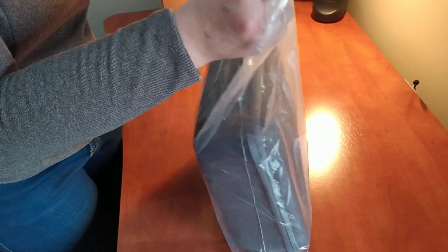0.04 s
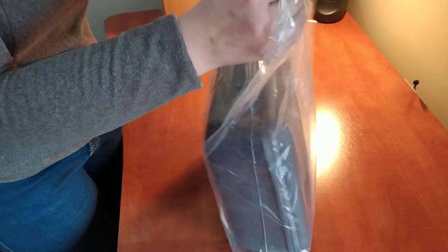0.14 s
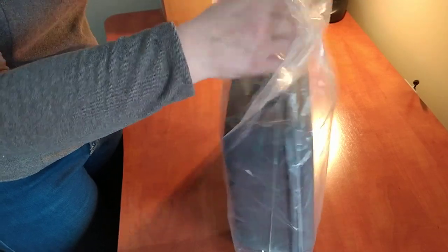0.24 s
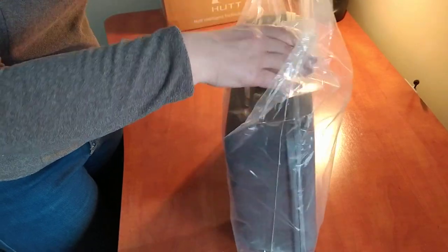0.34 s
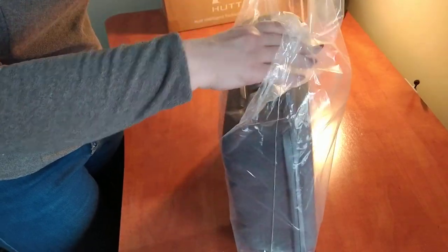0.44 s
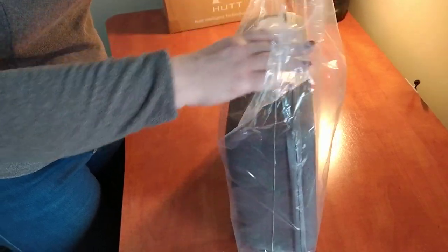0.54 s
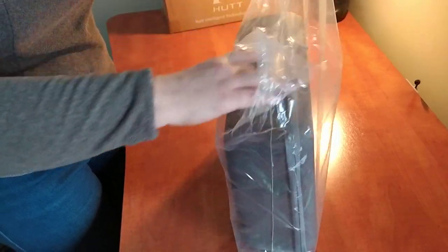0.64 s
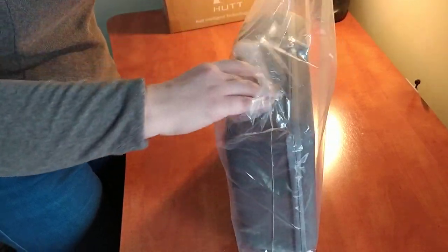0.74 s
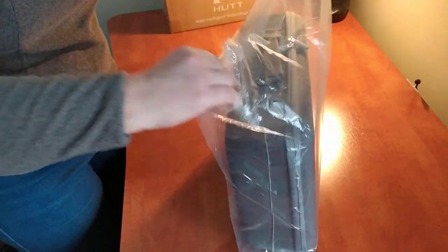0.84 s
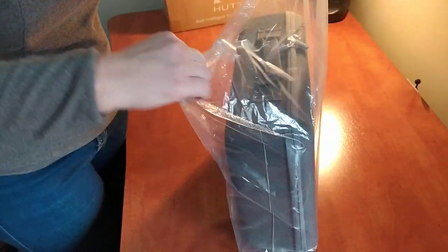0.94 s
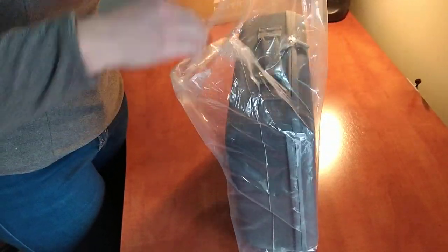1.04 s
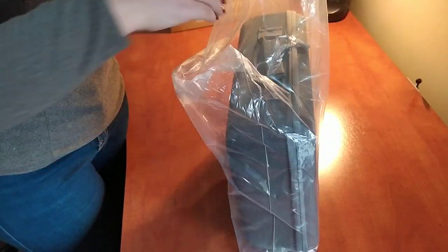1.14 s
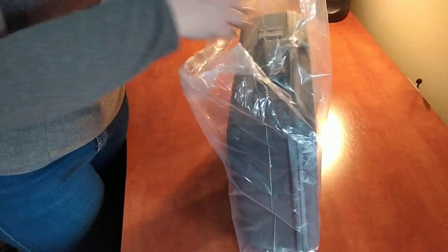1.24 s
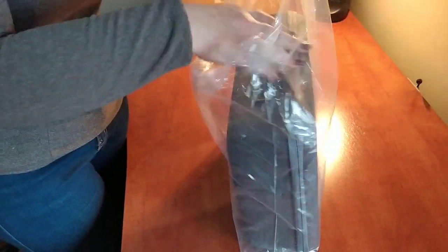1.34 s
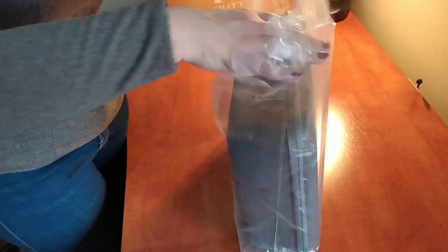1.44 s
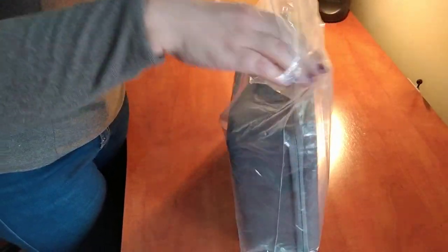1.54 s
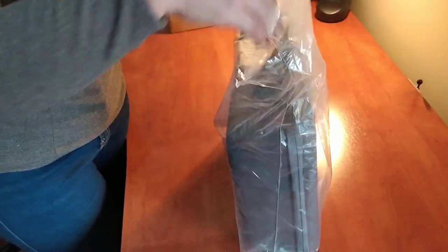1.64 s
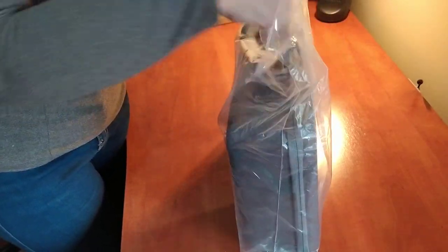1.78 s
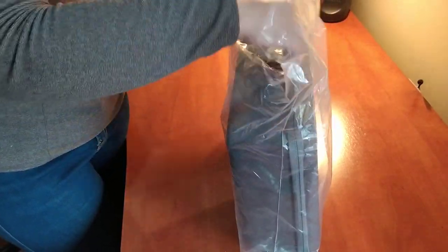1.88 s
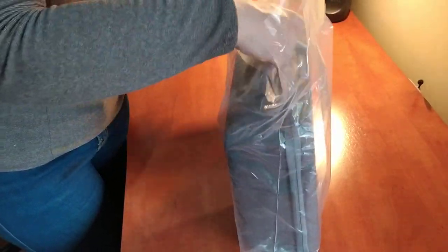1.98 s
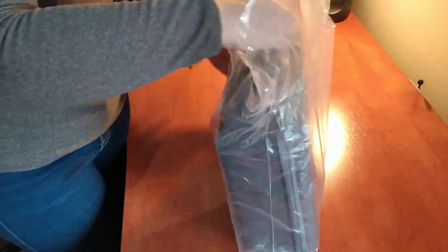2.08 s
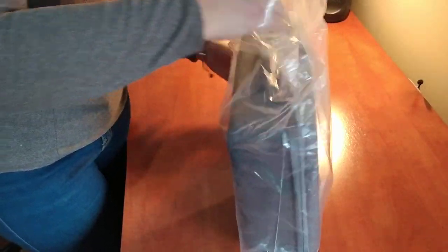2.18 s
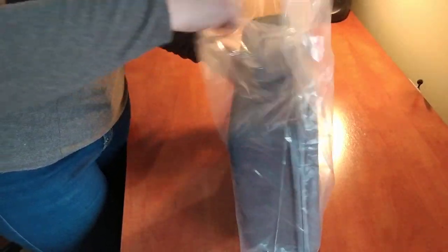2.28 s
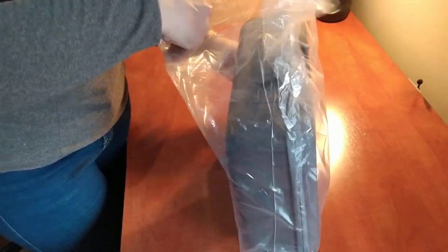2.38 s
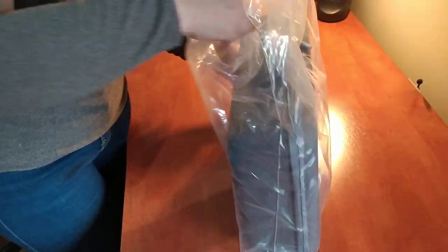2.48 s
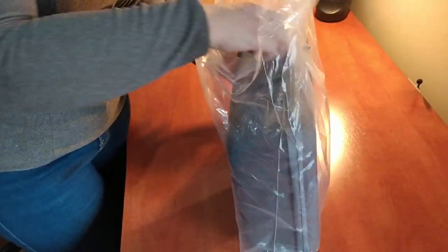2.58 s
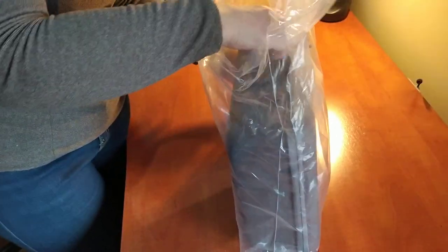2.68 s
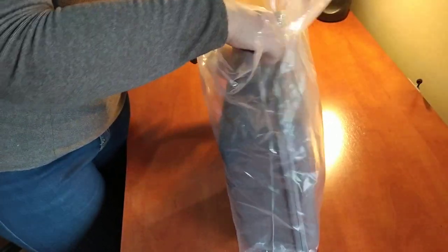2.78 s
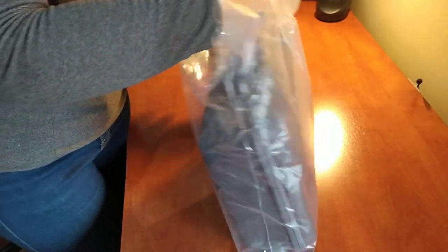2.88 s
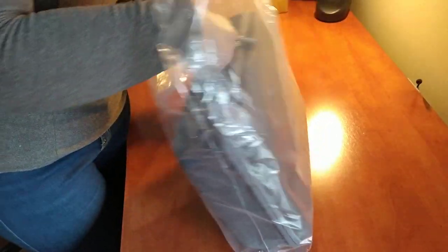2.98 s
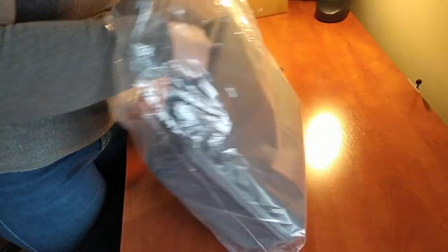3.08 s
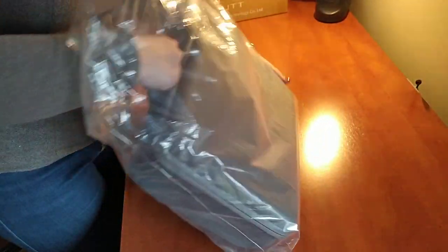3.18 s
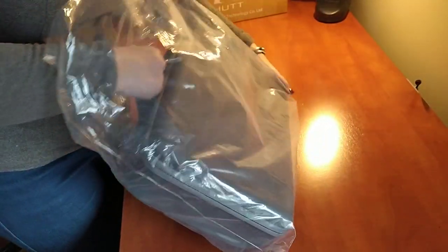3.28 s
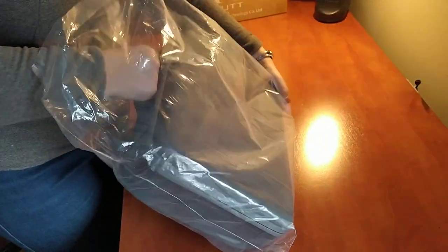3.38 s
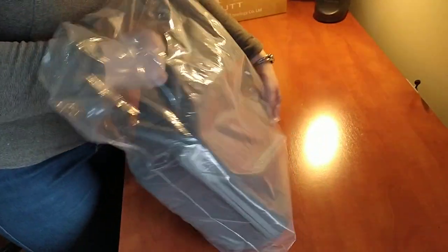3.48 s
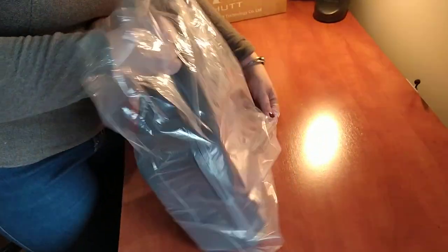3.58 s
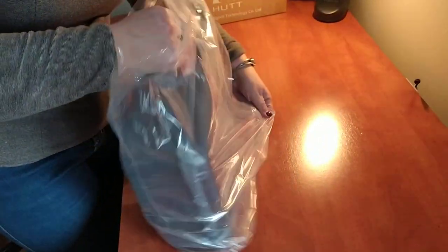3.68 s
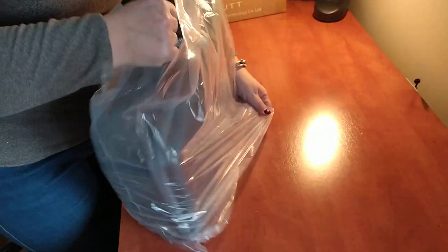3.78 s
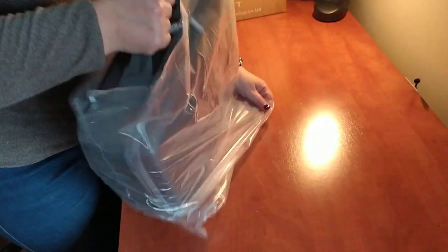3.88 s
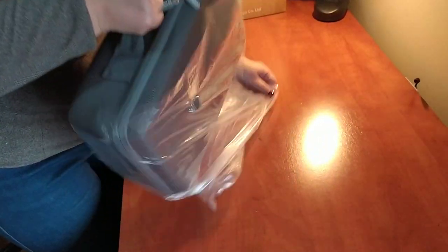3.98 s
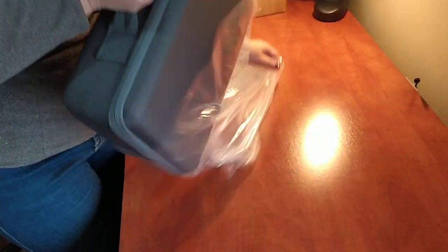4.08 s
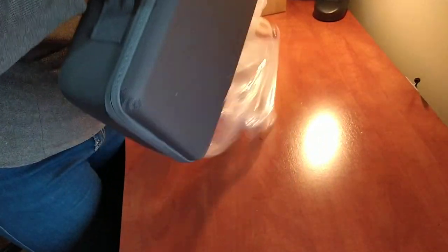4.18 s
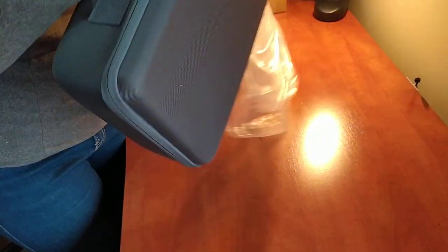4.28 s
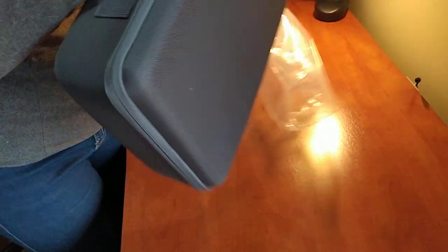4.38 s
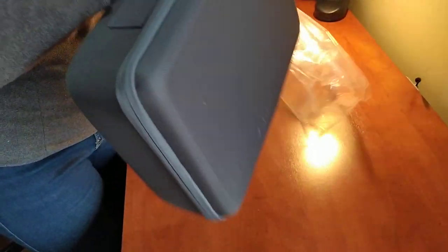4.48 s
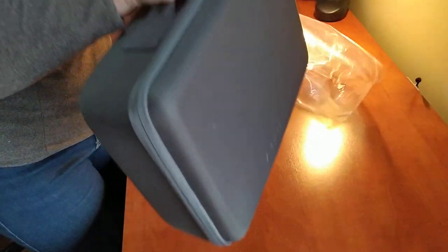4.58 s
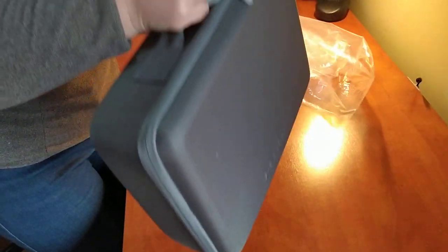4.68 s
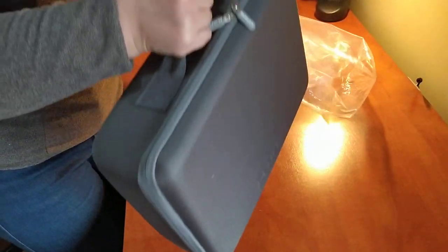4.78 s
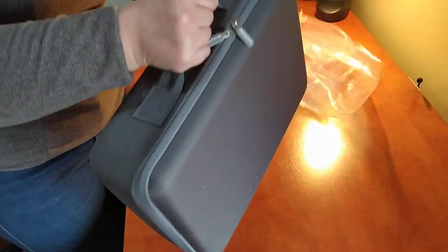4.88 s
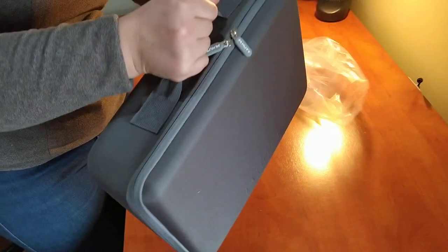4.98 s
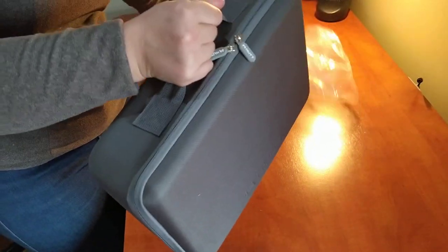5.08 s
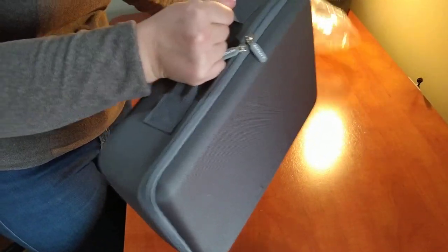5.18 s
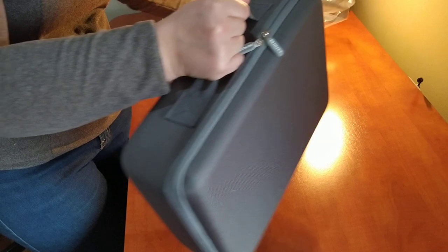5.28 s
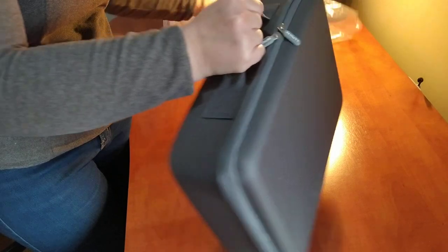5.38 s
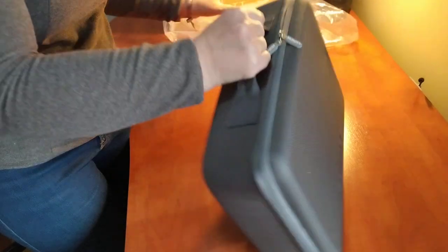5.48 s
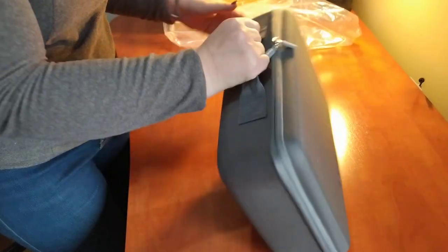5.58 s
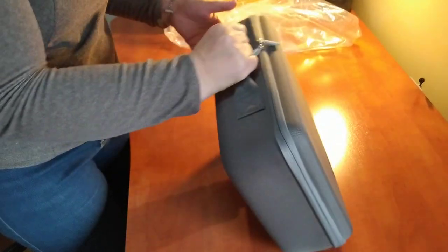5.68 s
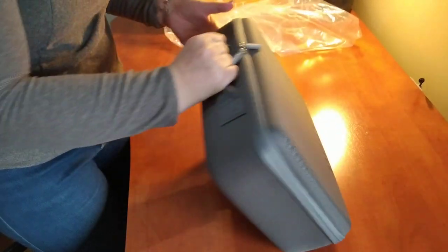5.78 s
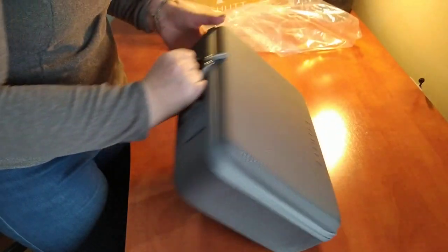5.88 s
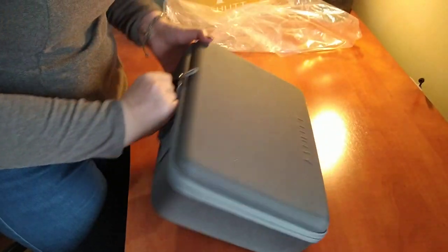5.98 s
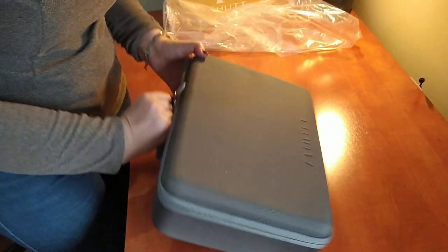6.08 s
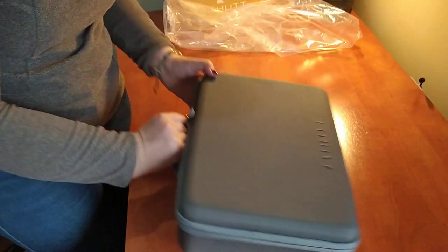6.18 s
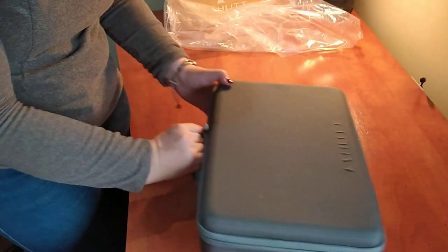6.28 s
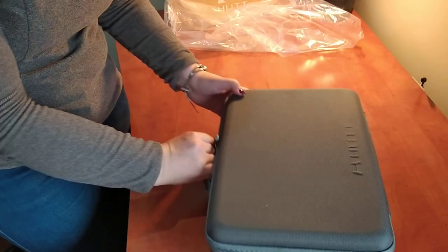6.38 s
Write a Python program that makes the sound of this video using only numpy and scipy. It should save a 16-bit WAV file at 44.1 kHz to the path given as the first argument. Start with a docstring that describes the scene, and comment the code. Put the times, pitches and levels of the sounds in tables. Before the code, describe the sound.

Close stereo sound in a small furnished room with very faint background noise. From 0 to about 1.3 seconds a thin plastic bag is grabbed and pulled: bright, dry crackle, papery rustle and hard snapping creases in irregular bursts. More tugs follow at 1.5, 2.1 and 2.3, gradually thinning. Around 2.8 to 3.2 the film is quieter and small, hollow knocks come from the hard case, with a slight rub. Crinkling rises again from 3.2 and is strongest at 3.7 to 4.2, full of sharp pops, as the bag comes off. At 4.64 a corner bumps the table with a short, falling thud. Rustles continue around 5.0 to 5.5 with light taps. From 5.7 to 5.9 the case lands in a rapid rocking run of dull, woody thumps and clacks, the heaviest near 5.84. A faint scrape and soft sliding hiss end it after 6.1.

```python
"""A thin plastic bag is worked off a hard-shell case on a wooden table in a small room.
Film: swarms of random clicks ring facet resonators; sharp snaps pair a ping with a short run of noise.
Case: damped modes and noise bursts make the knocks as it is lifted by its handle and the dull, rocking
thump as it is set down; shaped noise makes its slides along the wood. Faint room noise lies beneath."""
import sys
import numpy as np
from scipy import signal
from scipy.fft import rfft, irfft, next_fast_len
from scipy.io import wavfile
from scipy.ndimage import uniform_filter1d

SR = 44100
rng = np.random.default_rng(int(sys.argv[2]) if len(sys.argv) > 2 else 0)


def put_to_file(sound):
    """Save the sound as 16-bit audio at rate SR, in the file named by the first command-line argument."""
    columns = np.atleast_2d(sound).T  # one column per channel
    safe = np.clip(columns, -1, 1)
    whole_steps = np.round(safe * 32767)
    wavfile.write(sys.argv[1], SR, whole_steps.astype(np.int16))


N = 283987
TIME = np.arange(N) / SR


def from_db(db):
    """Decibels to amplitude gain."""
    return 10 ** (np.asarray(db) / 20)


def unit_energy(x):
    """Scale each channel to energy 1."""
    return x / np.sqrt(np.sum(x ** 2, axis=-1, keepdims=True) + 1e-20)


def at_hz(points, hz):
    """Interpolate a table on a log-frequency axis."""
    knots_hz, values = np.transpose(points)
    return np.interp(np.log(hz + 1), np.log(knots_hz), values)


def through(x, response):
    """Convolve with an impulse response, channel by channel."""
    return signal.oaconvolve(np.atleast_2d(x), np.atleast_2d(response), axes=-1)[:, :N]


def coloured(x, spectrum, size=4096):
    """Minimum-phase filter of the given spectrum that keeps the power of white input."""
    level_db = at_hz(spectrum, np.fft.rfftfreq(size, 1 / SR))
    cepstrum = irfft(np.log(from_db(level_db)))
    # fold the cepstrum to make the response causal
    cepstrum[1:size // 2] *= 2
    cepstrum[size // 2 + 1:] = 0
    return through(x, unit_energy(irfft(np.exp(rfft(cepstrum)))))


def diffuse(size):
    """White stereo noise, alike in the bass and nearly unrelated in the treble."""
    # channel correlation of the diffuse field: (frequency [Hz], correlation [-1..1])
    likeness = [(60, 0.3), (140, 1), (290, 0.9), (640, 0.67), (1400, 0.06), (3000, 0.22), (7000, 0.00084)]
    padded = next_fast_len(size, True)
    mid, side = rfft(rng.standard_normal((2, padded)))
    alike = at_hz(likeness, np.fft.rfftfreq(padded, 1 / SR))
    common = np.sqrt((1 + alike) / 2) * mid
    opposed = np.sqrt((1 - alike) / 2) * side * [[1], [-1]]
    return irfft(common + opposed, padded)[:, :size]


def burst(decay_s, size=4096):
    """Exponentially dying stereo noise with energy 1 per channel."""
    return unit_energy(diffuse(size) * np.exp(-TIME[:size] / decay_s))


def add(out, s, sound):
    """Mix a sound into out from time s on."""
    start = round(s * SR)
    out[..., start:start + sound.shape[-1]] += sound[..., :N - start]


def wander(per_s, size=32768):
    """Random values, per_s of them each second, joined by lines; spread near 1."""
    return np.interp(TIME * per_s, np.arange(size), rng.standard_normal(size))


def dying(energy, decay_s):
    """Spread every impulse of energy over an exponential decay."""
    keep = np.exp(-1 / (decay_s * SR))
    return signal.lfilter([1 - keep], [1, -keep], energy + 1e-18)


def with_scatter(direct, energy):
    """A direct sound plus its diffuse scatter off table and case, decaying with the energy."""
    scatter_share, scatter_decay_s = 0.68, 0.0044  # share is of the energy
    scatter = np.sqrt(scatter_share * dying(energy, scatter_decay_s)) * diffuse(N)
    return np.sqrt(1 - scatter_share) * direct + scatter


def room(x, tail_db, size=22050):
    """Add the short diffuse tail of a furnished room, starting 8 ms after the direct sound."""
    t60_s = 0.41
    t = TIME[:size]
    tail = unit_energy(diffuse(size) * (t > .008) * np.exp(-np.log(1000) * t / t60_s))
    return x + through(x, from_db(tail_db) * tail)


def from_left(x):
    """The case lies to the left, so its ring reaches the right side later."""
    lag_s = 0.00019
    return np.array([x, np.interp(TIME - lag_s, TIME, x)])


def room_noise():
    """Steady diffuse noise with the room's spectrum."""
    # room noise spectrum: (frequency [Hz], relative density [dB])
    air_spectrum = [(25, 1.5), (60, -11.5), (150, -6.5), (300, -8), (700, -16.5), (2000, -11.5),
                    (5000, -32), (15000, -46)]
    level_db = -59
    return from_db(level_db) * coloured(diffuse(N), air_spectrum)


def glide():
    """The case's fine-grained skin hisses as it glides on the wood: a swell that then holds."""
    # push along the table: (half-way time [s], swell time constant [s], level [dB])
    push = (6.2, 0.03, -43.5)
    # hiss spectrum: (frequency [Hz], relative density [dB])
    hiss_spectrum = [(290, -44), (500, -15), (724, -6.5), (1190, -12.5), (1450, -11), (2840, -15),
                     (3410, -20), (5540, -18), (5780, -13.5), (10100, 1), (15000, -26)]
    s, swell_s, level_db = push
    gain = (1 + np.tanh((TIME - s) / (2 * swell_s))) / 2
    return from_db(level_db) * gain * coloured(diffuse(N), hiss_spectrum)


def slides(judder_db):
    """The shell rubs on the wood: low noise in smooth swells with random judder."""
    # rubs: (middle time [s], half length to 1/e [s], level before judder [dB])
    rubs = [(2.844, 0.087, -49.5), (5.816, .03, -38.5), (6.185, 0.11, -47)]
    # rub spectrum: (frequency [Hz], relative density [dB])
    rub_spectrum = [(40, -20), (120, -10), (230, 6.5), (320, -0.5), (450, -10.5), (1000, -16), (2500, -22),
                    (6000, -51)]
    push = sum(from_db(db) * np.exp(-((TIME - s) / half_s) ** 2) for s, half_s, db in rubs)
    judder = from_db(judder_db * wander(56))
    return coloured(diffuse(N) * push * judder, rub_spectrum)


def bump(stiffening, relax_s, decay_s, contact_s, overtone, overtone_db):
    """The dented panel is stiff at first and relaxes, so thud and shorter overtone fall in pitch."""
    # corner meets table: (time [s], nominal level [dB], settled frequency [Hz])
    corner = (4.642, -22.5, 145)
    s, level_db, settled_hz = corner
    t, out = TIME[:N // 8], np.zeros(N)
    hz = settled_hz * (1 + stiffening * np.exp(-t / relax_s))
    phase = 2 * np.pi * np.cumsum(hz) / SR
    fade = np.exp(-t / decay_s)
    swing = (1 - np.exp(-t / contact_s)) * fade
    partials = np.cos(phase) + from_db(overtone_db) * fade * np.sin(overtone * phase)
    add(out, s, from_db(level_db) * swing * partials)
    return room(from_left(out), tail_db=-12.5)


def struck(modes, favoured_hz, focus_db, scatter_db, contact_s, size=22050):
    """Damped modes; those off the favoured pitch lose focus_db per octave squared."""
    hz, db, t60_s = np.transpose(modes)[:, :, None]
    t = TIME[:size]
    db = db - focus_db * np.log2(hz / favoured_hz) ** 2 + scatter_db * rng.standard_normal(hz.shape)
    rings = from_db(db) * np.exp(-np.log(1000) * t / t60_s) * np.sin(2 * np.pi * hz * t)
    signs = (-1) ** np.arange(len(modes))
    return signs @ rings * (1 - np.exp(-t / contact_s))


def knocks(shell_db, rim_db, clack_db, tap_db, boom_db, held_boom_db, clack_s, tap_s):
    """Blows ring shell and table; held contacts also tap, landings also ring the rim and clack."""
    # knocks on the held case:
    # (time [s], nominal level [dB], tap re level [dB], favoured frequency [Hz])
    hand_knocks = [(2.776, -41.5, -7, 198), (2.803, -38.5, -12, 240), (2.85, -41, -10, 250),
                   (2.884, -37.5, -11.5, 230), (2.970, -36.5, -10.5, 320), (3.0180, -30, -2, 218),
                   (3.0339, -25, -30, 160), (3.150, -39.5, -12, 199), (3.2204, -46.5, 1, 400),
                   (4.6435, -18.5, -19.5, 301), (4.6887, -24, -21, 222), (5.289, -31, -19, 369),
                   (5.358, -22, -14.5, 520)]
    # case lands on one edge, rocks and drops flat: (time [s], nominal level [dB],
    # rim and clack re level [dB], table boom re level [dB], favoured frequency [Hz])
    landings = [(5.692, -14.5, -13, -13.5, 281), (5.7257, -16.6, -15.5, -10, 304),
                (5.7384, -23.6, -13, -19, 509), (5.765, -21, -18, -14, 191), (5.8024, -13.8, -24, -20, 205),
                (5.823, -28.4, -4, -25, 553), (5.8358, -10, -9.5, -11.5, 316),
                (5.8599, -15.5, -15, -19, 261), (5.8747, -17.5, -17, -7.5, 203)]
    # shell modes: (frequency [Hz], relative level [dB], T60 [s])
    shell_modes = [(165.3, -2, 0.097), (221.4, -8.5, 0.17), (271.1, -0.1, 0.096), (341, -6.5, 0.13),
                   (357.6, -9.5, 0.26), (404, -5, 0.096), (481.4, -8.5, 0.19), (584, -6.5, .13),
                   (672, -3, 0.19), (910, -5, .07)]
    # stiff rim modes: (frequency [Hz], relative level [dB], T60 [s])
    rim_modes = [(507, -2, 0.055), (614, -8, 0.12), (668, -7, 0.089), (980, 2, 0.057), (1050, -12, .07),
                 (1220, -2.5, 0.045), (1600, -2, 0.099), (1980, -9, 0.067), (2090, -12, 0.056),
                 (2200, -14.5, 0.037)]
    # table top modes: (frequency [Hz], relative level [dB], T60 [s])
    table_modes = [(38.4, 6, 0.36), (56.5, -8, 0.51), (121.3, .1, .22), (151.4, -8, 0.34)]
    # light, hard tap spectrum: (frequency [Hz], relative density [dB])
    tap_spectrum = [(59, -37), (100, -8), (237, -0.5), (530, -16.5), (1040, -2.5), (1620, -12), (2520, -10),
                    (3200, -13), (3570, -30), (4060, -16), (5250, -41), (8000, -28), (10400, -56),
                    (17600, -120)]
    # landing clack spectrum: (frequency [Hz], relative density [dB])
    clack_spectrum = [(100, -32), (300, 3.5), (500, 6.5), (680, 0), (820, 2), (1020, 1.5), (1400, -4),
                      (2150, -4), (2750, -16.5), (3400, -29), (8000, -35), (15000, -56)]

    body, rim = np.zeros((2, N))
    taps, clacks = np.zeros((2, 2, N))
    held = [(s, db, hard_db, held_boom_db, hz) for s, db, hard_db, hz in hand_knocks]
    for s, db, _, weight_db, hz in held + list(landings):
        shell = struck(shell_modes, hz, focus_db=7.5, scatter_db=1.6, contact_s=0.001)
        boom = struck(table_modes, hz, focus_db=1.5, scatter_db=0.5, contact_s=0.0033)
        add(body, s, from_db(db + shell_db) * shell)
        add(body, s, from_db(db + weight_db + boom_db) * boom)
    for s, db, hard_db, _ in hand_knocks:
        add(taps, s, from_db(db + hard_db + tap_db) * burst(tap_s))
    for s, db, hard_db, _, _ in landings:
        ring = struck(rim_modes, favoured_hz=1000, focus_db=1.5, scatter_db=2.5, contact_s=.0004)
        add(rim, s, from_db(db + hard_db + rim_db) * ring)
        add(clacks, s, from_db(db + hard_db + clack_db) * burst(clack_s))
    hard = from_left(rim) + coloured(taps, tap_spectrum) + coloured(clacks, clack_spectrum)
    return from_left(body) + room(hard, tail_db=-6.0)


def effort():
    """Nominal crackle and rustle levels [dB]: pulls rise, hold, relax, and add in power."""
    # grabs and pulls at the bag:
    # (start [s], hold [s], nominal crackle [dB], rustle re crackle [dB])
    grabs = [(0, 0, -24, -9), (0.088, 0.064, -35.5, -7), (0.252, 0, -26, -7.5), (0.337, 0.0066, -32, -9.5),
             (0.392, 0.014, -27.5, -9), (0.509, 0.2, -44, -4.5), (0.778, 0.037, -35.5, -5),
             (0.851, 0.18, -31.5, -8.5), (0.95, 0.05, -39, 1), (1.096, 0.059, -35, -6.5),
             (1.323, 0.03, -50, -3.5), (1.462, 0.14, -35.5, -9), (1.556, 0.079, -27, -6.5),
             (1.724, 0.00047, -35.5, -4.5), (1.953, .17, -41, -5.5), (2.172, 0.07, -35.5, -8.5),
             (2.292, 0.0041, -32.5, -4), (2.423, 0.086, -34.5, -6.5), (2.658, 0.056, -46.5, -7.5),
             (2.85, 0.061, -47.5, -17), (2.985, 0.022, -46.5, -8.5), (3.096, 0.056, -51, -6),
             (3.239, 0.034, -39.5, -4.5), (3.365, 0.14, -37, -6.5), (3.55, 0.049, -30, -8.5),
             (3.673, 0.011, -25, -7.5), (3.744, 0.13, -28.5, -9), (3.929, 0.16, -31, -8.5),
             (4.099, .15, -26, -8), (4.279, 0.021, -30.5, -6), (4.381, 0.002, -33, -11),
             (4.44, 0.07, -40.5, -11.5), (4.577, 0.1, -38, -9.5), (4.739, 0.014, -39, -8.5),
             (4.818, 0.04, -52.5, -0.5), (5.003, 0.076, -31.5, -5), (5.105, 0.045, -31.5, -6.5),
             (5.182, 0.06, -34.5, -7), (5.324, 0.091, -36.5, -6.5), (5.488, 0, -45, 0),
             (5.71, 0.0029, -50, 0), (5.804, 0, -46.5, -10), (5.863, 0, -45.5, -0.5)]
    # the film never lies quite still: (nominal crackle [dB], nominal rustle [dB])
    rest_levels = (-59, -61.5)
    tighten_db_per_s, relax_db_per_s = 379, 166
    fumble_db, fumble_per_s = 0.66, 35  # unsteady grip
    t = TIME[::44]
    start_s, hold_s, db, sheet_db = np.transpose(grabs)[:, :, None]
    rise_db = tighten_db_per_s * np.maximum(start_s - t, 0)
    fall_db = relax_db_per_s * np.maximum(t - start_s - hold_s, 0)
    crackle_db = db - rise_db - fall_db
    fumble = fumble_db * wander(fumble_per_s)
    levels = []
    for layer_db, rest_db in zip((crackle_db, crackle_db + sheet_db), rest_levels):
        power = np.sum(from_db(layer_db) ** 2, axis=0) + from_db(rest_db) ** 2
        levels.append(np.interp(TIME, t, 10 * np.log10(power)) + fumble)
    return levels


def avalanches(per_s, decay_s, size_db):
    """One buckle sets off its neighbours: a gain that jumps at random moments and dies away."""
    starts = (rng.random(N) < per_s / SR) * np.minimum(rng.exponential(1, N), 3)
    return np.sqrt(1 + from_db(size_db) ** 2 * dying(starts, decay_s) * decay_s * SR)


def buckling(level_db, peak_per_s, crowding, spread_db, clump_db, aim_db):
    """Stereo clicks of buckling film; harder handling makes them both denser and louder."""
    rate_per_s = peak_per_s * from_db(crowding * (level_db - level_db.max()))
    sizes = from_db(spread_db * np.minimum(rng.exponential(1, N), 5)) * rng.choice([-1, 1], N)
    clicks = sizes * (rng.random(N) < rate_per_s / SR)
    clicks = clicks * avalanches(per_s=70, decay_s=0.0033, size_db=clump_db)
    # aim_db spreads each side's level; the right side's clicks shift by up to 25 samples
    left, right = clicks * from_db(aim_db * rng.standard_normal((2, N)))
    arrival = np.clip(np.arange(N) + rng.integers(-25, 26, N), 0, N - 1)
    clicks = np.array([left, np.bincount(arrival, right, N)])
    # the hand feeds in energy steadily, whatever the size of the clicks
    power = np.abs(uniform_filter1d(np.mean(clicks ** 2, axis=0), size=2400)) + 1e-4
    return from_db(level_db) * clicks / np.sqrt(power)


def facets(clicks, low_hz, high_hz, quality, shift_db, count=20):
    """Each click rings one facet for a few cycles; facet gains wander as the bag deforms."""
    reshape_per_s = 40
    dealt = rng.integers(0, count, N)
    rings = 0
    for k, hz in enumerate(np.geomspace(low_hz, high_hz, count)):
        resonator = signal.iirpeak(hz, quality, fs=SR)
        gain = from_db(shift_db * wander(reshape_per_s))
        rings = rings + signal.lfilter(*resonator, clicks * (dealt == k) * gain + 1e-18)
    # a narrow facet passes only part of a click's energy
    passed = np.pi / 2 / quality / np.log(high_hz / low_hz)
    return with_scatter(rings / np.sqrt(passed), clicks ** 2)


def bag(crackle_db, rustle_db):
    """Small creases crackle near 9 kHz; the broad sheet rustles lower down."""
    # crackle spectrum: (frequency [Hz], relative density [dB])
    crackle_spectrum = [(1500, -22.5), (3500, -15), (5200, -9.5), (7200, -4.5), (8400, -1), (9300, 3),
                        (10400, -0.5), (11500, -8.5), (13000, -18.5), (16000, -27)]
    # rustle spectrum: (frequency [Hz], relative density [dB])
    rustle_spectrum = [(40, -18), (95, -13), (165, -3), (400, -4), (550, -12), (720, -2), (1050, -3.5),
                       (1600, 0), (2300, 2), (3200, -2.5), (4500, -4.5), (8000, -29)]
    creases = buckling(crackle_db, peak_per_s=5000, crowding=0.28, spread_db=2.0, clump_db=4, aim_db=0.0)
    folds = buckling(rustle_db, peak_per_s=2400, crowding=.3, spread_db=3.0, clump_db=3.5, aim_db=1.5)
    creases = facets(creases, low_hz=2570, high_hz=16200, quality=6.2, shift_db=2.0)
    folds = facets(folds, low_hz=445, high_hz=6100, quality=4.0, shift_db=3.0)
    crackle = coloured(creases, crackle_spectrum)
    rustle = coloured(folds, rustle_spectrum)
    return from_db(-1.06) * crackle + from_db(0.79) * rustle


def lesser_snaps(crackle_db, decay_s, ping_db, count):
    """Rows of small snaps at random times, their energy set above the crackle level there."""
    above_db, spread_db, pan_db = 19.5, 1.5, 7
    when, size, side = rng.random((count, 3)).T
    at = (when * N).astype(int)
    db = crackle_db[at] + above_db - spread_db * np.log(np.maximum(size, np.exp(-3)))
    return [(*row, decay_s, ping_db) for row in zip(TIME[at], db, pan_db * (2 * side - 1))]


def snaps(crackle_db, run_db, ping_db, grain_db, rise_s):
    """A big crease gives way in a short, jagged run of buckles, with a ping from the same moment."""
    # single creases snapping through: (time [s], nominal energy [dB], left re right [dB],
    # run decay [s], nominal ping re run [dB])
    big_snaps = [(0.0892, 3, -5, 0.001, 0.5), (0.0915, -6, 4, 0.00076, 6), (0.227, -19, 0, .001, 2),
                 (0.2518, 3, 1, 0.0035, -13), (0.394, -6, 7, 0.0023, -6), (0.412, -6, 2, .001, -3),
                 (0.4853, -2, 2, 0.0024, -0.5), (0.5657, -1, 1, 0.0016, 1.5), (0.611, -12.5, 0, .002, -2.5),
                 (0.6278, -15, 2.5, 0.0018, -9), (0.6836, -9.5, 1.5, 0.0035, -9),
                 (0.7372, -9.5, 1, 0.0018, -15), (0.7632, -5.5, 1, 0.0033, -16),
                 (0.8178, 0, 1, 0.0023, -11), (.8945, -6.5, 1, 0.00092, 3), (0.866, -9, 5, .001, -3),
                 (0.930, -6, 4, 0.0011, 4), (1.0176, -2.5, -2, .001, 1), (1.0565, -4, 0, .0007, 0),
                 (1.087, -7, 3, .002, -5), (1.1585, -4, 2, .002, -8), (1.2615, -9.5, -1, 0.0026, -12.5),
                 (1.4392, -9.5, 5, .002, -8.5), (1.4652, -6.5, 3, 0.0023, -8), (1.4886, -2, -4, 0.0024, -6),
                 (1.6535, -3, -3, 0.0018, -4), (1.9485, -20, 0, .002, -8), (2.053, -11.5, 1, 0.0019, 0),
                 (2.0982, -2, 4, 0.0022, -23), (2.2485, -7, 0, .001, -2.5), (2.2768, 1.5, -2.5, 0.0019, -7),
                 (2.401, -7.5, 2, 0.0028, -14), (2.4595, -14, 2, .001, -7), (2.5436, -13, -4, 0.0012, -4),
                 (2.7015, -15.5, -0.5, 0.0012, -6), (2.9695, -17.5, 1, 0.00086, -15),
                 (3.2006, -14.5, -3, .003, -15), (3.210, -22, -2, .001, -8),
                 (3.2212, -10.5, 1.5, 0.0011, -15), (3.2525, -11, 0, .002, -6), (3.290, -9.5, -2, .002, -9),
                 (3.3612, -6, 1, .002, -4), (3.3815, -7, 0, .002, -12), (3.403, -12, 0.5, 0.0016, -7.5),
                 (3.496, -21, -3, .001, 2), (3.6855, 3, 3, 0.0036, -15), (3.692, -1, 2, .002, -9),
                 (3.704, 0, -4, 0.0018, -6), (3.8225, -3.5, 7, .0007, 1), (3.8295, -4, -2.5, .0007, 9),
                 (3.8685, 1, 4, .001, 12), (3.9179, 3.5, -1, 0.0013, 8), (4.015, -8, 6.5, 0.0011, 0),
                 (4.0985, -1, 4, 0.0024, -2), (4.162, -2, 1, 0.001, 1), (4.378, -7.5, 1, .002, -10),
                 (4.5605, -15.5, 3, .002, -3), (4.741, -13, 3, .002, -5), (4.759, -8.5, 1, 0.0018, 4),
                 (4.8467, -12, -4, 0.0023, -6), (5.008, -3, 0, 0.0016, -8), (5.112, -3.5, 1, 0.0034, 3),
                 (5.4095, -22, 0, .003, -6), (5.486, -5, -2, .002, 2)]
    # run spectrum: (frequency [Hz], relative density [dB])
    run_spectrum = [(150, -17), (1000, -9.5), (2300, 0.5), (3500, -6.5), (5500, 0), (7500, 2.5), (9200, 9),
                    (10600, 4), (12500, -8.5), (16000, -17.5)]
    # the ringing facet: a short ping that starts together with the run
    median_hz, spread_octaves, ping_decay_s = 9780, 0.11, 0.00082
    energy, pings = np.zeros((2, 2, N))
    t = TIME[:2048]
    rise = 1 - np.exp(-t / rise_s)
    rows = lesser_snaps(crackle_db, decay_s=0.0018, ping_db=-4, count=140) + list(big_snaps)
    jagged = from_db(grain_db * wander(2500))
    for s, db, pan_db, decay_s, ping_rel_db in rows:
        detune, *turns = rng.standard_normal(3)
        ping_gain = from_db(ping_rel_db)
        sides_db = db + np.array([[pan_db], [-pan_db]]) / 2
        gain = from_db(sides_db) / np.hypot(1, ping_gain)  # run and ping share the energy
        grain = jagged.take(round(s * SR) + np.arange(len(t)), mode="wrap")
        run = unit_energy(rise * np.exp(-t / decay_s) * grain)
        # the two sides hear the ping out of step
        cycles = median_hz * 2 ** (spread_octaves * detune) * t + np.array(turns)[:, None]
        ping = unit_energy(rise * np.exp(-t / ping_decay_s) * np.sin(2 * np.pi * cycles))
        add(energy, s, (gain * from_db(run_db) * run) ** 2)
        add(pings, s, gain * ping_gain * from_db(ping_db) * ping)
    runs = with_scatter(np.sqrt(energy) * diffuse(N), energy)
    return pings + coloured(runs, run_spectrum)


def scene():
    """Bag and case in the room, over faint room noise."""
    case = knocks(shell_db=-11.5, rim_db=-10.5, clack_db=25.0, tap_db=27.5, boom_db=1.0,
                  held_boom_db=-37, clack_s=0.01, tap_s=0.01)
    case += slides(judder_db=2.5) + glide()
    case += bump(stiffening=1.38, relax_s=0.008, decay_s=0.022, contact_s=0.0011,
                 overtone=2.1, overtone_db=-9.5)
    crackle_db, rustle_db = effort()
    film = bag(crackle_db, rustle_db)
    film += snaps(crackle_db, run_db=.5, ping_db=0.0, grain_db=3, rise_s=0.00038)
    return room_noise() + case + room(film, tail_db=-9.5)


def record(dry):
    """The left and right sides differ in colour, strongly above 12 kHz; the top is cut steeply."""
    # left side re right: (frequency [Hz], level difference [dB])
    side_balance = [(500, -0.5), (1000, 2), (1900, 3), (4000, -1), (7500, -3), (10500, 0.5), (13000, 12),
                    (15000, -9.5)]
    cutoff_hz = 16000
    padded = next_fast_len(N + N // 64, True)
    balance_db = at_hz(side_balance, np.fft.rfftfreq(padded, 1 / SR))
    gains = from_db([balance_db / 2, -balance_db / 2])
    heard = irfft(rfft(dry, padded) * gains, padded)[:, :N]
    lowpass = signal.ellip(10, .1, 70, cutoff_hz, fs=SR, output="sos")
    return signal.sosfilt(lowpass, heard)


dry = scene()
out = record(dry)
put_to_file(out)
```